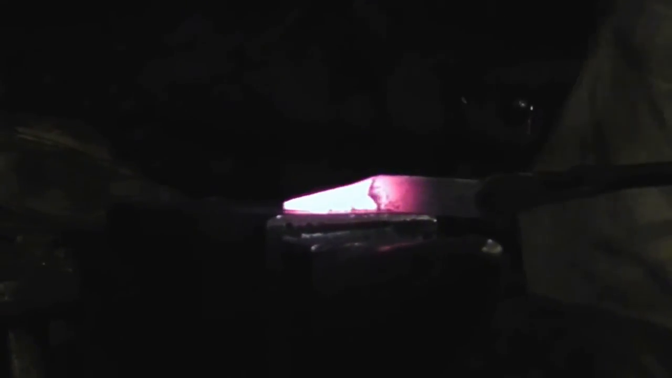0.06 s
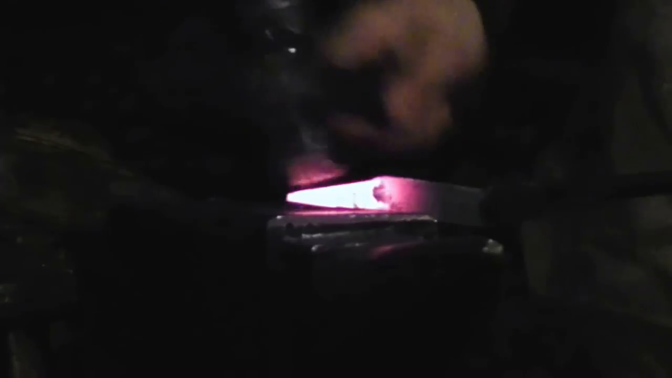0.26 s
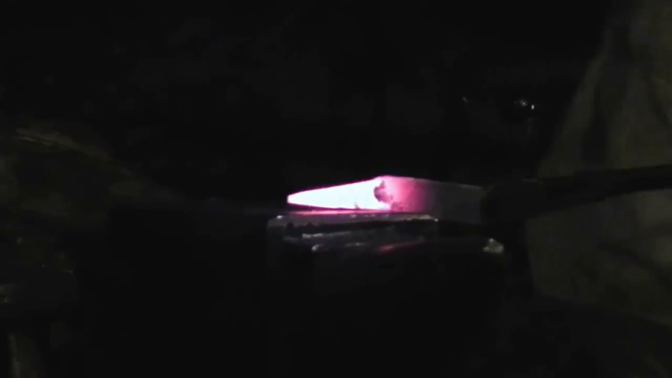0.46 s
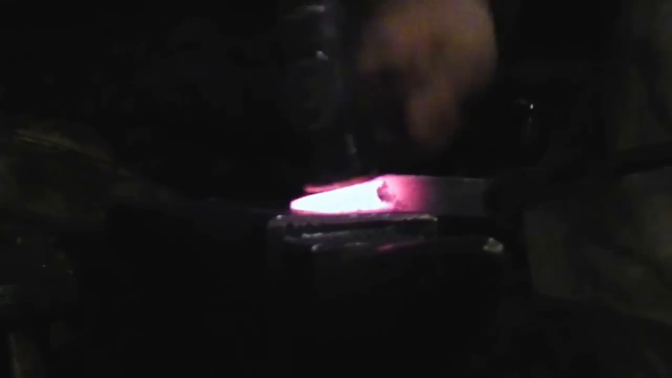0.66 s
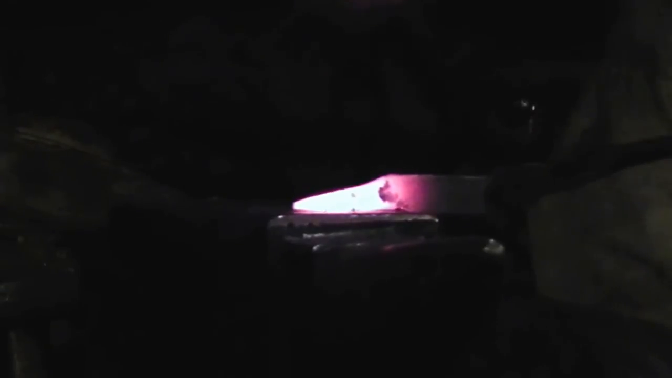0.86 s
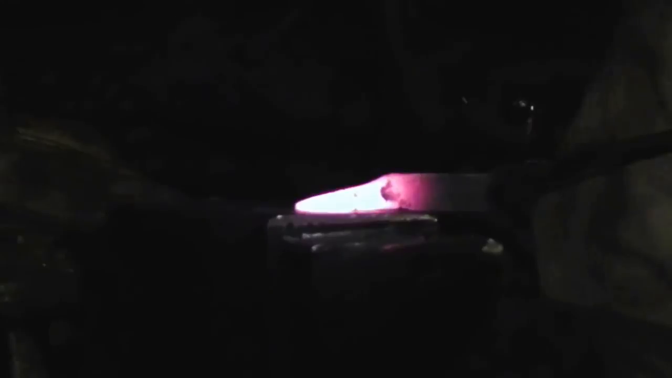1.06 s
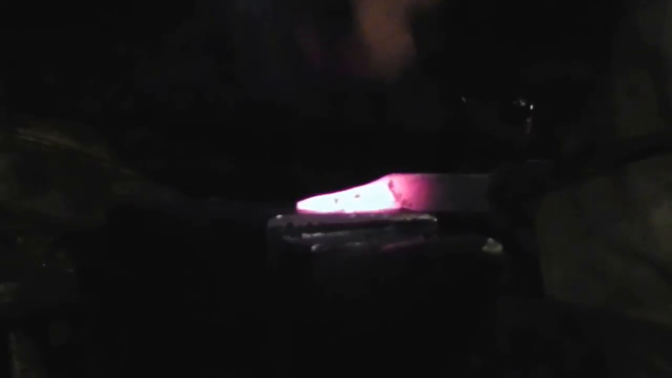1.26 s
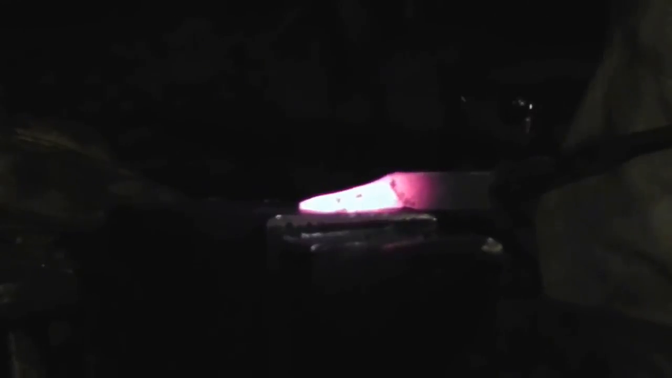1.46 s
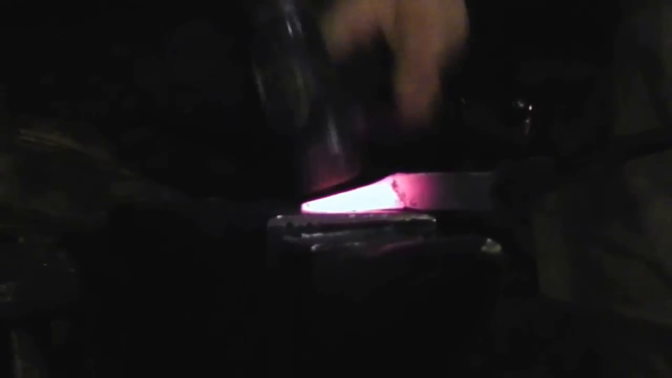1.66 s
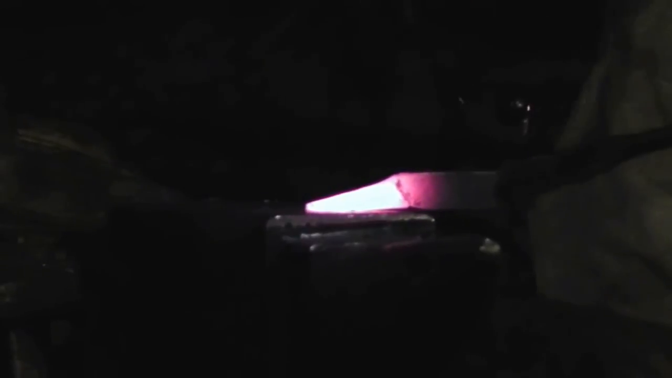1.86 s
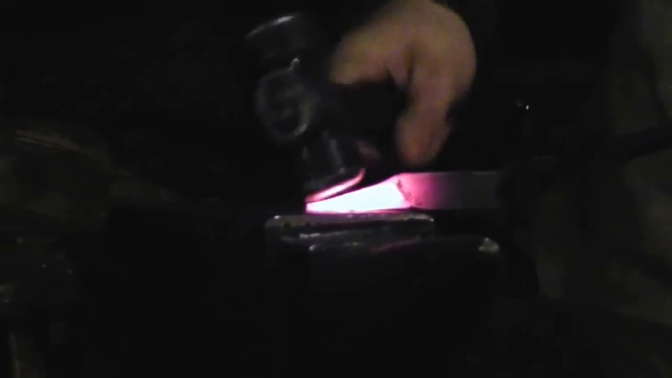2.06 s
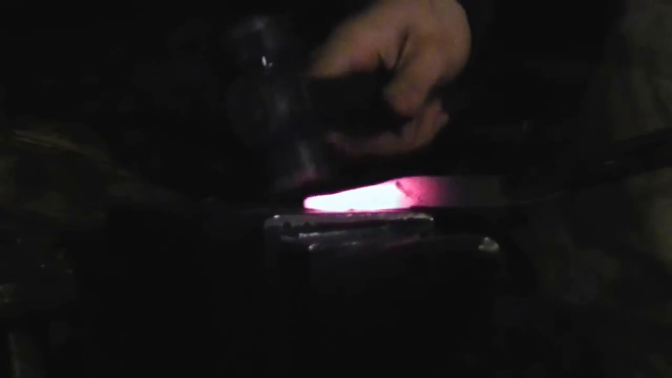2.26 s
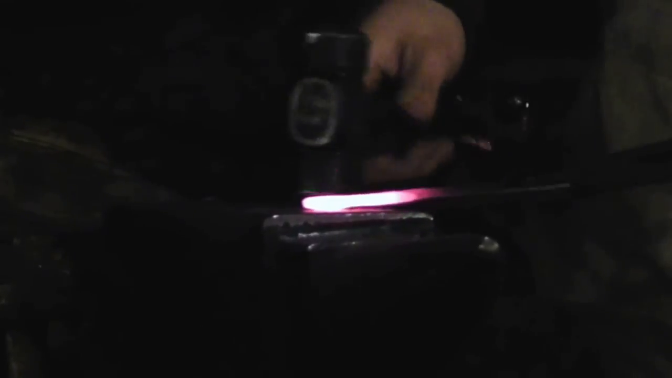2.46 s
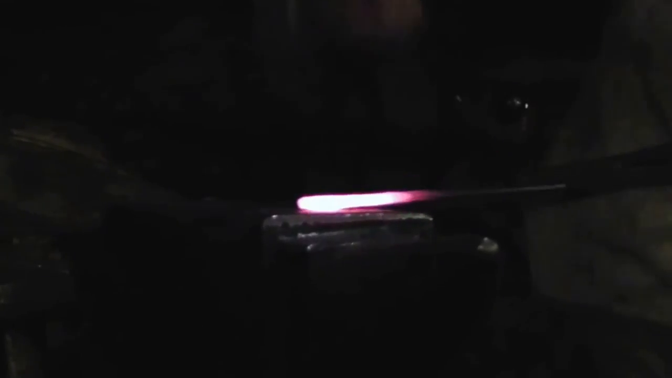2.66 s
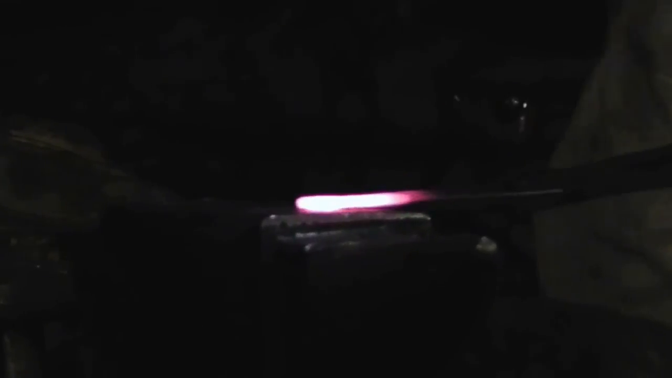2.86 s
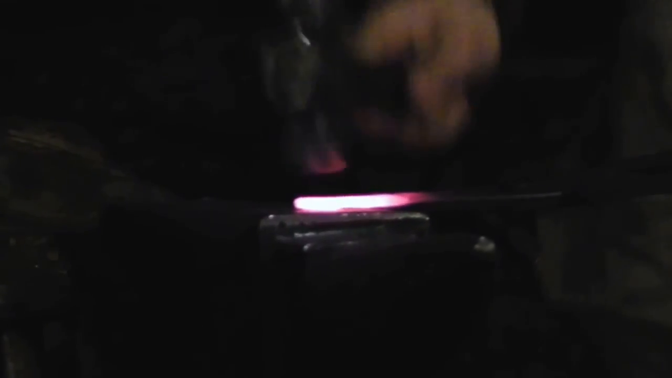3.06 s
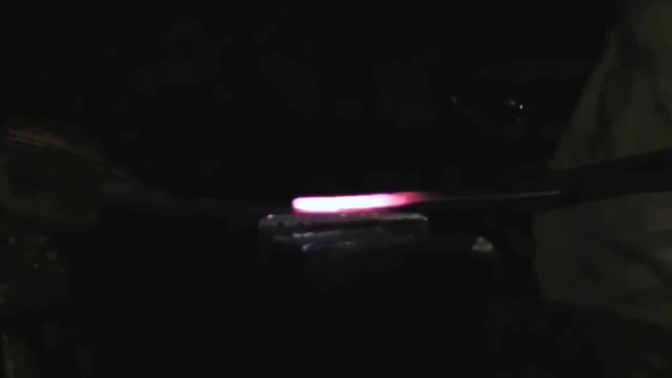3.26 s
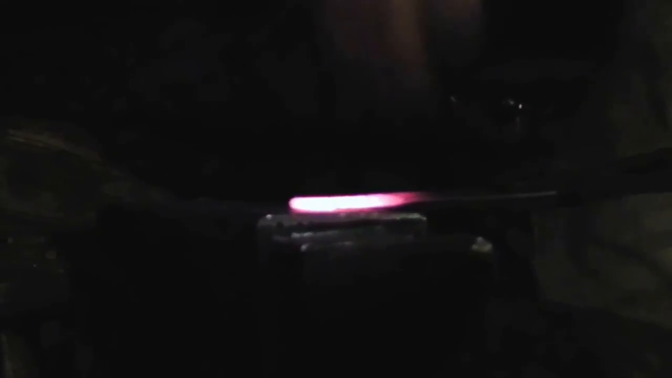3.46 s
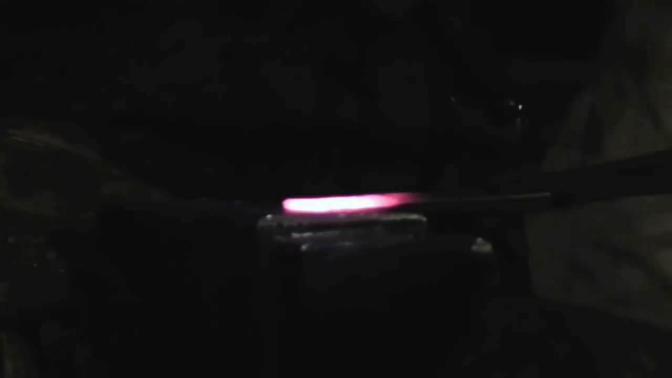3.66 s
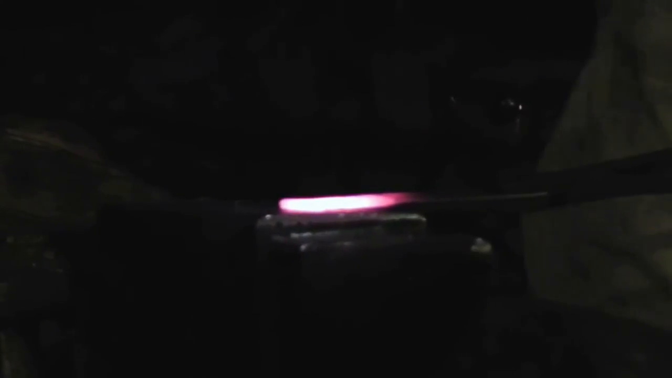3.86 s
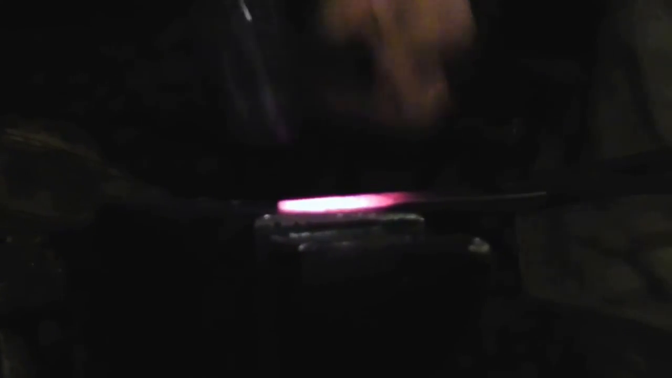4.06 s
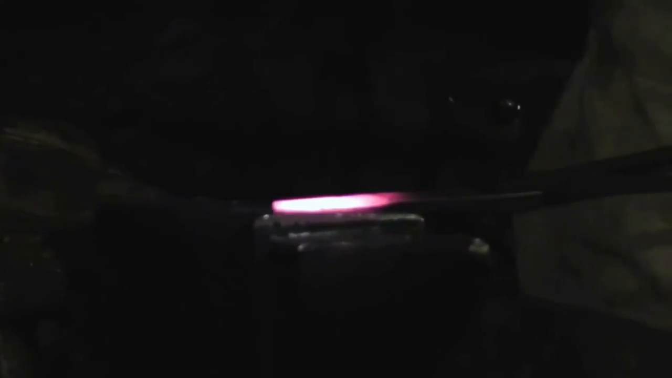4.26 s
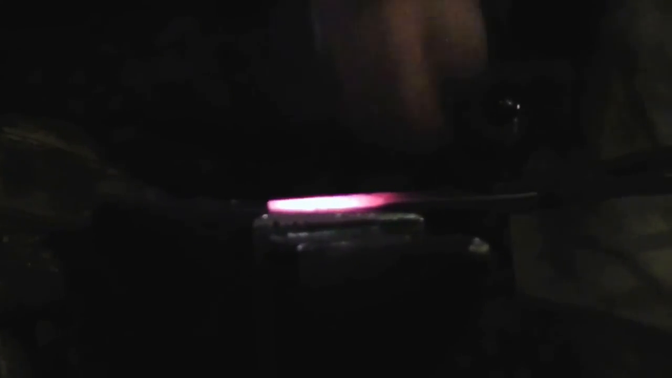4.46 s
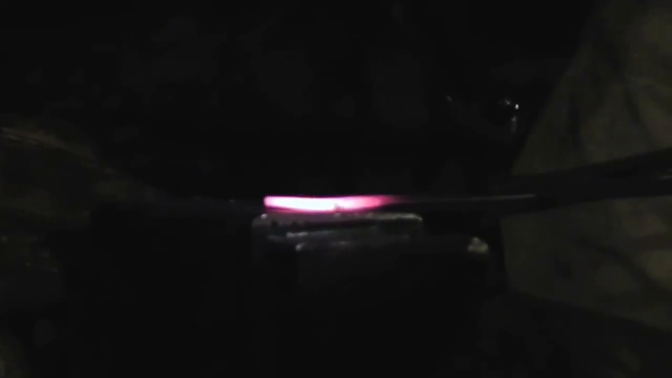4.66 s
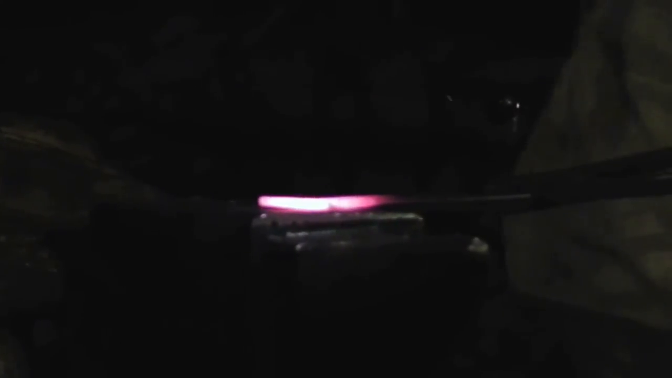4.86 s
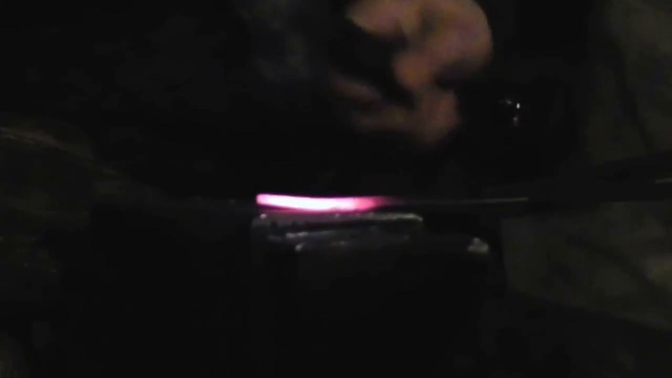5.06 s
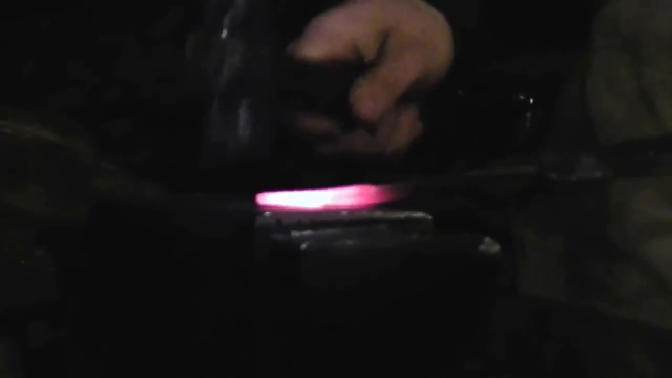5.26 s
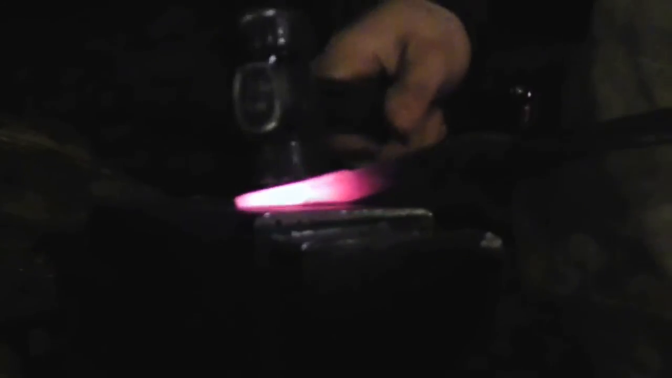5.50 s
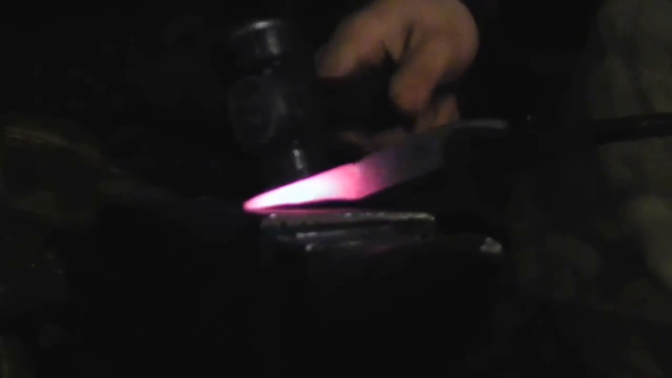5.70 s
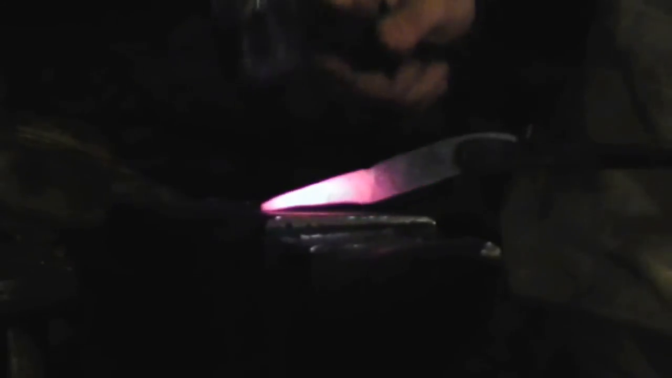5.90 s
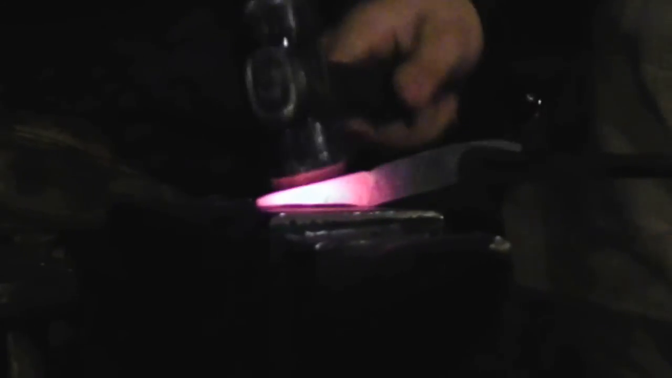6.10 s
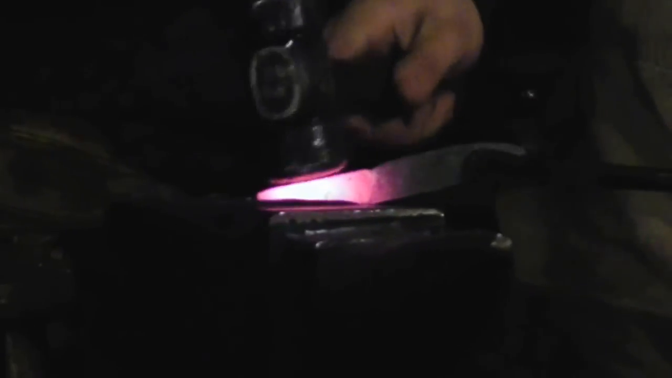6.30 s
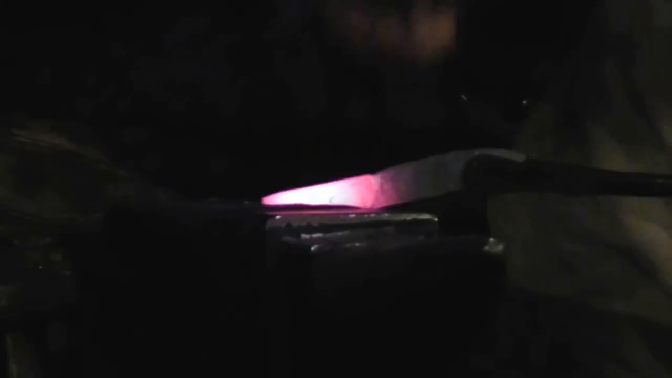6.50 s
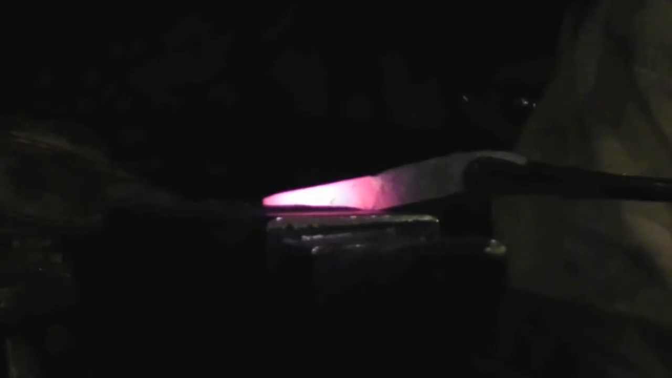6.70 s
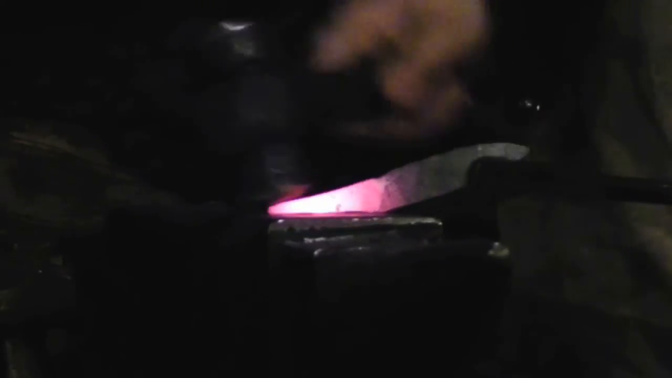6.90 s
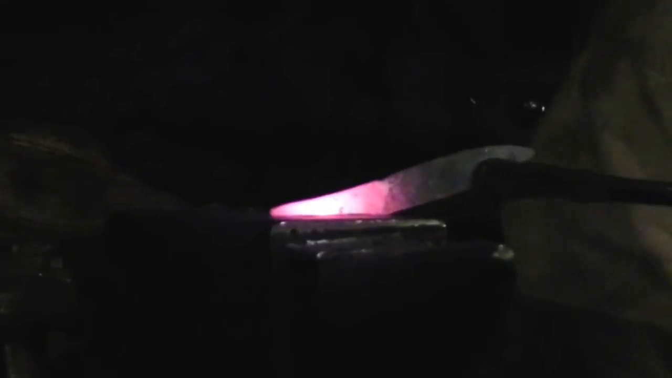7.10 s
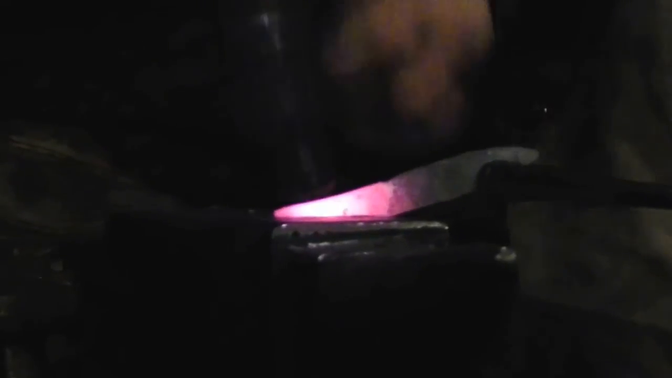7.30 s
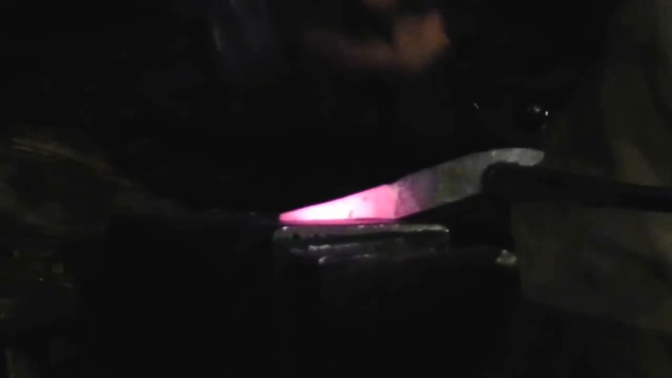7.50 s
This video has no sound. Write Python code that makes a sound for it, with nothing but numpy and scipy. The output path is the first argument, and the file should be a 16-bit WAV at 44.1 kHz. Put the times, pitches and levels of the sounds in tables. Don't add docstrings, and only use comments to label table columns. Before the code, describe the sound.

A hand hammer works a glowing bar on a small anvil in a bare, echoing workshop. Loud, cracking clanks fall at about 0.1, 0.6, 1.1, 1.5 and 2.0 seconds, each with a brief steel ring and about a third of a second of room decay. At 2.2 to 2.35 the hammer makes three quick, ringing, weakening bounces. Five more blows land from 2.9 to 4.9, roughly half a second apart, the last two harder and brighter. From 5.15 to 5.5 it rebounds on bare steel in an accelerating, fading patter. A light clear tap comes at 6.0, a duller glancing hit at 6.75, a last full blow at 7.2, then muffled tong knocks around 7.45 to 7.53 as the tongs shuffle. Faint metallic ticks and a soft low draught, easing after 6, lie beneath. The small microphone overloads, crunching the peaks and briefly ducking the sound.

```python
import sys
import numpy as np
from scipy import signal
from scipy.fft import rfft, irfft
from scipy.io import wavfile
from scipy.ndimage import uniform_filter1d

SR = 44100
rng = np.random.default_rng(int(sys.argv[2]) if len(sys.argv) > 2 else 0)


def elevation(decibels):
    levels = np.asarray(decibels, float)
    return 10 ** (levels / 20)


def generate_wav(sig):
    pcm = np.round(np.clip(np.atleast_2d(sig).T, -1, 1) * 32767).astype(np.int16)
    wavfile.write(sys.argv[1], SR, pcm)


N = 332682
RING_S, WALL_TOP_HZ, MIC_TOP_HZ = .7, 2150, 8230
OVERLOAD = .73
HALO_WIDTH = .008

# (time [s], strength [dB], hardness [dB], ring [dB], spot [-1 heel to 1 horn])
BLOWS = [(.134, -6, -5, -6.5, -0.57), (.596, -5.5, -3.5, -4.5, .9), (1.060, -6.5, -4, -4.5, 0.71),
         (1.520, -6, -2.5, -3, 0.23), (1.966, -8.5, 3, 1, 0.14), (2.938, -7.5, -0.5, -6.5, -0.49),
         (3.422, -6, 0.5, -3.5, -0.58), (3.910, -7, -3.5, -2.5, -0.57), (4.413, -9.5, 5, 1, -0.18),
         (4.905, -9.5, 5, 2, -0.26), (7.232, -8.5, -5.5, -3, -0.83)]
# (time [s], strength [dB], hardness [dB], ring [dB])
BOUNCES = [
    (2.192, -7.5, -16.5, 1.5),
    (2.285, -11.5, -8, 4),
    (2.340, -15, -10, 5),
]
# (time [s], strength [dB], hardness [dB], ring [dB])
REBOUNDS = [
    (5.154, -11, 6, 4),
    (5.297, -13, 2, 2.5),
    (5.400, -17, -5, -4.5),
    (5.464, -21.5, -12, 1),
    (5.503, -29, -8, -24),
]
# (time [s], strength [dB], hardness [dB], ring [dB])
TAPS = [
    (6.006, -23.5, 0.5, 2.5),
    (6.067, -41.5, 3.5, -7),
]
# (time [s], strength [dB], hardness [dB], ring [dB])
GLANCE = [(6.760, -12, 1, -8)]
# (time [s], strength [dB], hardness [dB], ring [dB])
KNOCKS = [
    (7.437, -33.5, -23, -16),
    (7.448, -40, -20, -1.5),
    (7.497, -41, -1, -1),
    (7.524, -37.5, 9, -3),
    (7.533, -33, -27, 1),
]
# (time [s], level [dB], pitch [Hz])
TICKS = [(2.435, -45, 7100), (2.545, -56, 4000), (3.773, -56.5, 905), (3.773, -54, 5500),
         (4.690, -61, 6600), (5.910, -60.5, 5000), (6.068, -37, 6300), (6.242, -59, 4010),
         (6.440, -61.5, 6000), (6.601, -58.5, 5990), (6.615, -61, 796), (6.660, -61, 4500),
         (6.716, -60, 796), (6.735, -55, 5500), (7.142, -68.5, 3030), (7.437, -43.5, 750)]
# (blow [dB], bounce [dB], tap [dB], knock [dB], rebound [dB], T60 [s])
BODY_MODES = [(-26.5, -30, -27, -17.5, -46, 0.29), (-31, -41, -36, -26, -20.5, 0.053),
              (-30, -20.5, -35, -19, -23, 0.13), (-27, -35, -19, -15.5, -30.5, 0.22),
              (-25, -37, -41, -39, -29.5, 0.025), (-17, -31, -28, -21, -28.5, 0.09),
              (-7, -10.5, -17.5, -19, -13, 0.26), (-27.5, -35, -33.5, -27.5, -40, 0.29),
              (-21.5, -31.5, -29, -30, -38.5, 0.24), (-23.5, -5.5, -17, -23, -19.5, 0.073),
              (-30.5, -34, -53, -41, -23.5, 0.29), (-24, -4.5, -41, -34.5, -13, 0.087)]
# (blow [dB], bounce [dB], tap [dB], knock [dB], rebound [dB], T60 [s])
HEAD_MODES = [(-35.5, -35, -41, -25.5, -40.5, .15), (-25, -22, -18, -40, -17, .14),
              (-26, -13, -33, -43.5, -30, 0.3), (-21, -15, -37, -42, -9.5, 0.37),
              (-13, -13, -31, -35, -6, 0.2), (-33, -26, -19, -45, -14, 0.09),
              (-21, -34, -22, -37.5, -31, 0.25), (-33, -18, -27, -38, -15, 0.18),
              (-27, -28, -18, -40, -28, .09), (-24, -19, -27, -35, -12, .15),
              (-18, -32, -20, -46, -30, 0.21), (-18, -30, -18, -40, -20, 0.045)]
MODE_HZ = [222, 260, 716, 1037, 1290, 1553, 1793, 1807, 1960, 2241, 2466, 2530, 3100, 3295, 3470, 3603,
           3870, 4050, 4861, 5340, 5935, 6232, 6612, 7200]
# (pitch [Hz], hardness gain [dB/dB], gain towards horn [dB])
CHOOSY_MODES = [(1960, -.2, 4), (2530, 0, -3), (3603, 1.1, -2), (3870, .3, 1), (4861, .6, 7), (6232, .5, 1),
                (6612, .4, -5)]
SPREAD_DB = [1.5, 2, 3, 3, 2]
HALO_DB = [7, 17, 21, 14, 13]
WALL_S = [.005577, .022309, .038762, .165086]
WALL_DB = [2, -2, 4.5, -20]
# (frequency [Hz], level [dB/Hz])
CRACK = [(59, -44), (100, -2.5), (999, -5), (1850, -13), (3750, -7), (4580, -9), (7070, -4), (7600, -3.5),
         (9880, -39), (16700, -120)]
# (delay [s], level [dB])
ECHOES = [(.0056, -5), (.0085, -16.5), (0.012, -10), (0.024, -15)]
# (frequency [Hz], T60 [s])
TAIL_T60 = [(50, 2.9), (80, 0.65), (150, 0.51), (300, 0.34), (1000, 0.31), (3000, 0.29), (7500, 0.25)]
# (frequency [Hz], level [dB/Hz])
BLOW_TAIL = [(60, -41.5), (120, -22), (205, -10.5), (260, -5), (330, -7.5), (440, -11), (620, -6.5),
             (1000, -6.5), (1700, -4.5), (2400, -6.5), (3000, -12), (3700, -7), (4600, -15.5),
             (7600, -16.5)]
BOUNCE_TAIL = [(35, -54), (60, -50.5), (303, 1.5), (592, -13.5), (1070, -8.5), (1390, -14.5), (1840, -8),
               (2700, -11), (3590, -1.5), (7600, -23.5), (9880, -61), (16700, -120)]
REBOUND_TAIL = [(35, -69), (60, -49), (233, -2), (546, -8), (2550, -5), (3050, -9.5), (3520, -4.5),
                (4400, -10.5), (5500, -14.5), (7600, -15.5), (9880, -56.5), (16700, -120)]
TAP_TAIL = [(35, -66), (60, -34), (303, 5), (446, -5), (1040, -3), (1230, -9.5), (2000, -12), (2440, -23.5),
            (5960, -7.5), (7600, -4), (9880, -47), (16700, -120)]
GLANCE_TAIL = [(35, -57.5), (60, -37.5), (263, -2.5), (493, -8.5), (696, -5.5), (2820, -21.5),
               (3250, -18.5), (4490, -19.5), (6330, -18.5), (7600, -13.5), (9880, -55), (16700, -120)]
KNOCK_TAIL = [(35, -49), (60, -42), (211, -1.5), (1000, -5.5), (1390, -22.5), (1530, -20.5), (2120, -17.5),
              (7600, -39), (9880, -69), (16700, -120)]
# (frequency [Hz], level [dB/Hz])
AIR = [(15, -43), (25, -23.5), (210, 3.5), (373, -1), (497, -2), (602, -0.5), (647, -4), (1360, -4.5),
       (2190, -8), (2470, -9.5), (3060, -11.5), (4380, -13.5), (7600, -15.5), (9880, -42), (16700, -120)]
# (time [s], level [dB])
AIR_DB = [(0, -60), (3, -59.5), (5.8, -60), (6.3, -63), (7.54, -63.5)]
# (peak time [s], level [dB], rise [s], fall [s])
SHUFFLES = [(6.75, -57.5, 0.037, .08), (7.45, -63, .05, .1), (7.54, -49.5, .05, .1)]


def at_hz(points, hz):
    table_hz, value = np.transpose(points)
    return np.interp(np.log(hz), np.log(table_hz), value)


def rms_one(x):
    return x / np.sqrt(np.mean(x ** 2) + 1e-20)


def coloured(white, spectrum):
    size = white.shape[-1]
    hz = np.maximum(np.arange(size // 2 + 1) * SR / size, 1)
    return rms_one(irfft(rfft(white) * elevation(at_hz(spectrum, hz)), size))


def add(out, s, sound):
    i = round(s * SR)
    out[i:i + len(sound)] += sound[:N - i]


def strokes(table, column, tail, force_db, crack_db, echo_db, tail_db, lasting, sameness,
            thud_db, thud_follows, crack_follows):
    s, level_db, bright_db, ring_db, *spot = np.transpose(table)
    spot = spot[0] if spot else 0 * s
    size = round(RING_S * SR)
    shared = np.sqrt(sameness) * rng.standard_normal(size)
    white = shared + np.sqrt(1 - sameness) * rng.standard_normal((len(s), size))
    wash = coloured(halo(white, column), tail)
    sound = elevation(tail_db) * reverberation(wash, thud_db + thud_follows * bright_db, bright_db, lasting)
    crack = cracks(rng.standard_normal((len(s), size)), bright_db, echo_db)
    sound += elevation(crack_db + crack_follows * bright_db)[:, None] * crack
    sound += elevation(ring_db)[:, None] * ringing(column, bright_db, spot)
    fade = np.minimum(np.linspace(4, 0, size), 1)
    out = np.zeros(N)
    for when_s, db, one in zip(s, level_db, sound * fade):
        add(out, when_s - .0004, elevation(db + force_db) * one)
    return out


def cracks(white, bright_db, echo_db, contact_s=.0041):
    t = np.arange(white.shape[1]) / SR
    burst = coloured(white, CRACK) * (1 - np.exp(-t / .0004)) * np.exp(-(t / contact_s) ** 2)
    burst = signal.sosfilt(signal.butter(2, 180, "high", fs=SR, output="sos"), burst)
    dull = signal.lfilter([.22], [1, -.78], burst)
    burst = dull + elevation(bright_db)[:, None] * (burst - dull)
    echoes = sum(elevation(db + echo_db) * np.roll(burst, round(s * SR), axis=1) for s, db in ECHOES)
    return burst + echoes


def ringing(column, bright_db, spot, swell_s=.002):
    modes = np.array(BODY_MODES + HEAD_MODES)
    t = np.arange(round(RING_S * SR)) / SR
    low = (np.array(MODE_HZ) < WALL_TOP_HZ)[:, None]
    waver = rng.standard_normal((len(modes), len(t)))
    waver = rms_one(uniform_filter1d(uniform_filter1d(waver, size=900), size=900))
    envelope = elevation(-60 * t / modes[:, -1:]) * (1 - np.exp(-t / swell_s))
    sines = np.sin(2 * np.pi * np.outer(MODE_HZ, t)) * envelope
    returns = sum(elevation(db) * np.roll(sines, round(s * SR), axis=1) for s, db in zip(WALL_S, WALL_DB))
    heard = np.where(low, sines + returns, sines * (1 + .3 * waver))
    spread_db = SPREAD_DB[column] * rng.standard_normal((len(bright_db), len(modes)))
    return elevation(modes[:, column] + spread_db + favoured(bright_db, spot)) @ heard


def favoured(bright_db, spot):
    hz, per_db, per_spot = np.transpose(CHOOSY_MODES)
    extra_db = np.outer(np.clip(bright_db, -7, 7), per_db) + np.outer(spot, per_spot)
    return extra_db @ np.equal.outer(hz, MODE_HZ)


def halo(white, column):
    size = white.shape[1]
    hz = np.arange(size // 2 + 1) * SR / size
    centre_hz = np.array(MODE_HZ)[:, None]
    level_db = np.array(BODY_MODES + HEAD_MODES)[:, column, None] + HALO_DB[column]
    peaks = elevation(level_db) / (1 + ((hz - centre_hz) / (HALO_WIDTH * centre_hz)) ** 2)
    return irfft(rfft(white) * (1 + (peaks * (centre_hz > WALL_TOP_HZ)).sum(axis=0)), size)


def reverberation(white, thud_db, bright_db, lasting, build_cycles=2, build_s=.003):
    size = white.shape[1]
    t = np.arange(size) / SR
    spectrum, hz = rfft(white), np.arange(size // 2 + 1) * SR / size
    out = 0
    for centre_hz in 50 * 2 ** (np.arange(23) / 3):
        share = np.clip(1 - 3 * np.abs(np.log2(np.maximum(hz, 1) / centre_hz)), 0, 1)
        rise = 1 - np.exp(-t / (build_s + build_cycles / centre_hz))
        fall = elevation(-60 * t / lasting / at_hz(TAIL_T60, centre_hz))
        tone_db = thud_db * np.clip(np.log2(1200 / centre_hz) / 2, 0, 1)
        tone_db = tone_db + bright_db * np.clip(np.log2(centre_hz / 1800), 0, 1)
        out = out + elevation(tone_db)[:, None] * irfft(spectrum * share, size) * rise * fall
    return out


def ticks(cycles=13.0, tail_db=-8):
    out, t = np.zeros(N), np.arange(4000) / SR
    for s, db, hz in TICKS:
        band = signal.butter(1, [hz * .8, hz * 1.2], "band", fs=SR, output="sos")
        burst = rms_one(signal.sosfilt(band, rng.standard_normal(len(t))))
        decay = np.exp(-t * hz / cycles) + elevation(tail_db - 500 * t)
        add(out, s, elevation(db) * burst * (1 - np.exp(-t / .0015)) * decay)
    return out


def air(flicker_db=.7):
    t = np.arange(N) / SR
    flicker = rms_one(uniform_filter1d(rng.standard_normal(N), size=3000))
    shuffle = 0
    for peak_s, db, rise_s, fall_s in SHUFFLES:
        shuffle = shuffle + elevation(db) * np.exp(-np.abs(t - peak_s) / np.where(t < peak_s, rise_s, fall_s))
    level = np.hypot(elevation(np.interp(t, *np.transpose(AIR_DB))), shuffle)
    return level * elevation(flicker_db * flicker) * coloured(rng.standard_normal(N), AIR)


def scene():
    blows = strokes(BLOWS, column=0, tail=BLOW_TAIL, force_db=1.0, crack_db=1.0, echo_db=-13.5, tail_db=-3.5,
                    lasting=1.104, sameness=.76, thud_db=3.1, thud_follows=-.26, crack_follows=.21)
    bounces = strokes(BOUNCES, column=1, tail=BOUNCE_TAIL, force_db=-9.5, crack_db=7.5, echo_db=-17.0, tail_db=11.5,
                      lasting=.84, sameness=.18, thud_db=8.9, thud_follows=1.1, crack_follows=.1)
    rebounds = strokes(REBOUNDS, column=4, tail=REBOUND_TAIL, force_db=-5.5, crack_db=3.5, echo_db=-9.0, tail_db=4.5,
                       lasting=.76, sameness=.53, thud_db=-.4, thud_follows=.3, crack_follows=.063)
    taps = strokes(TAPS, column=2, tail=TAP_TAIL, force_db=-5, crack_db=9.5, echo_db=-3, tail_db=5.5,
                   lasting=.88, sameness=.35, thud_db=3.5, thud_follows=1.0, crack_follows=.27)
    glance = strokes(GLANCE, column=2, tail=GLANCE_TAIL, force_db=-1.0, crack_db=2.5, echo_db=-9.5, tail_db=-3.5,
                     lasting=1.0, sameness=.11, thud_db=5.5, thud_follows=0, crack_follows=0)
    knocks = strokes(KNOCKS, column=3, tail=KNOCK_TAIL, force_db=2.5, crack_db=-40, echo_db=-6, tail_db=2,
                     lasting=.37, sameness=.18, thud_db=-.5, thud_follows=.079, crack_follows=-1.12)
    return (blows + bounces + rebounds + taps + glance + knocks + ticks() + air())[None]


def gain_control(x, knee_db=-24, slope=.69, release_db_s=260, attack_s=.008):
    release_db = release_db_s * np.arange(N) / SR
    level_db = 10 * np.log10(signal.lfilter([.004], [1, -.996], x ** 2) + 1e-12)
    held_db = np.maximum.accumulate(level_db + release_db) - release_db
    pole = np.exp(-1 / (attack_s * SR))
    cut_db = signal.lfilter([1 - pole], [1, -pole], slope * np.maximum(held_db - knee_db, 0))
    return x * elevation(-cut_db)


def low_pass(x):
    return signal.sosfilt(signal.butter(12, 16820, fs=SR, output="sos"), x)


def record(dry):
    x = gain_control(dry[0])
    x = 1.203 * np.tanh(x / .84)
    x = signal.sosfilt(signal.cheby2(10, 60, MIC_TOP_HZ * 1.086, fs=SR, output="sos"), x)
    x = x / (1 + (np.abs(x) / OVERLOAD) ** 14) ** (1 / 14)
    x = signal.sosfilt(signal.cheby2(12, 60, 17000, fs=SR, output="sos"), x)
    return low_pass(x[None])


dry = scene()
out = record(dry)
generate_wav(out)
```